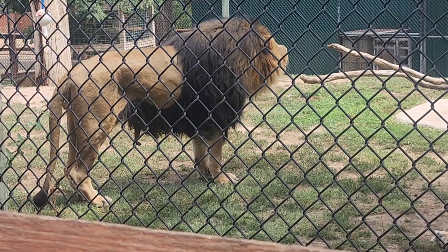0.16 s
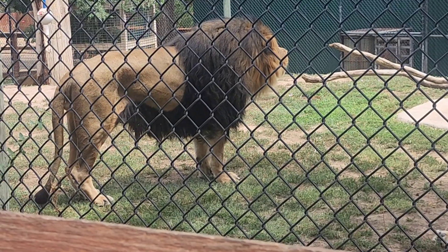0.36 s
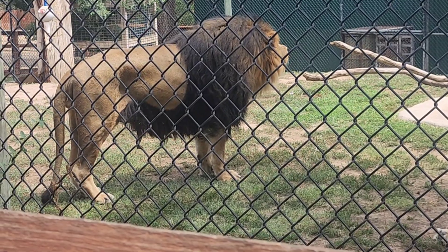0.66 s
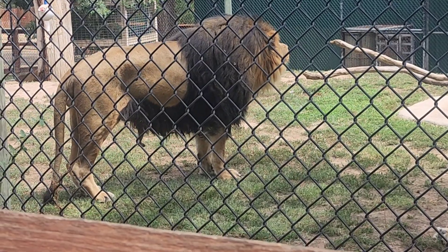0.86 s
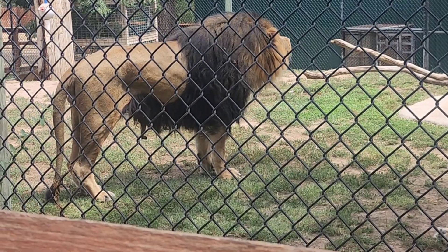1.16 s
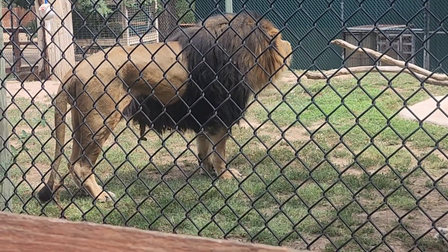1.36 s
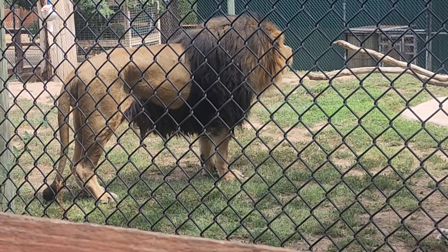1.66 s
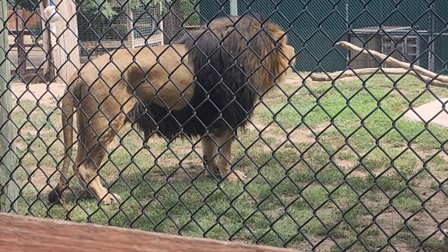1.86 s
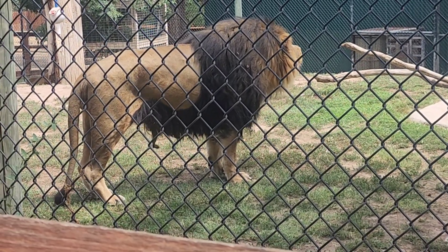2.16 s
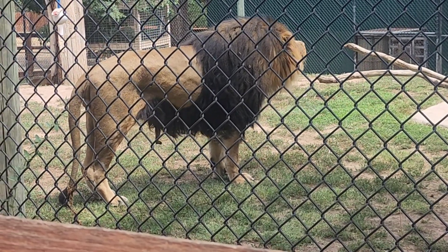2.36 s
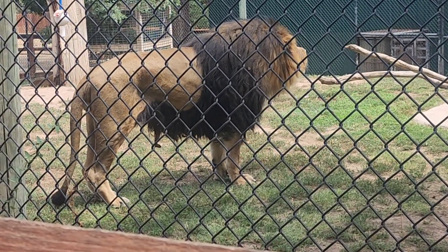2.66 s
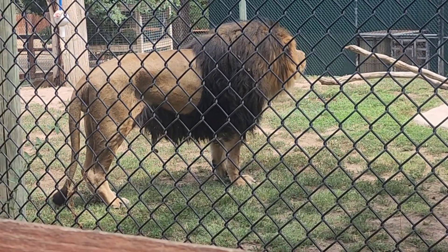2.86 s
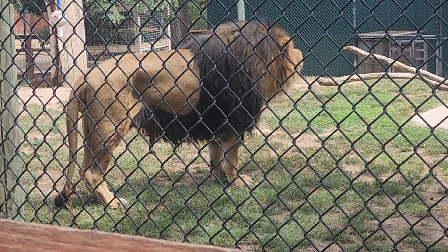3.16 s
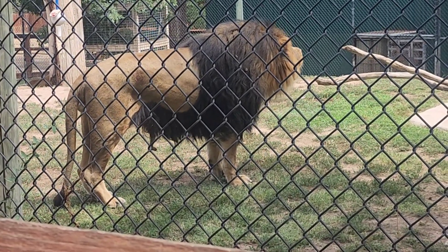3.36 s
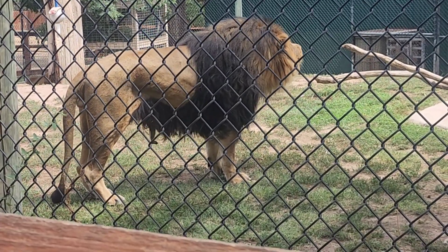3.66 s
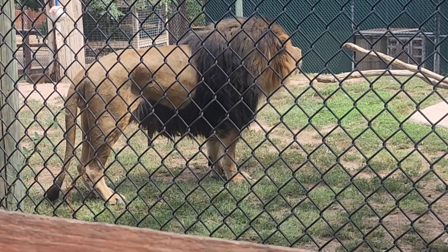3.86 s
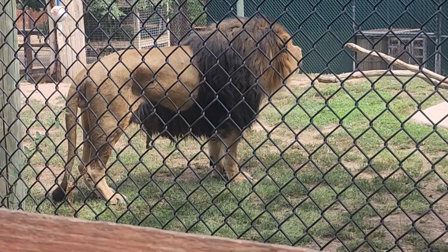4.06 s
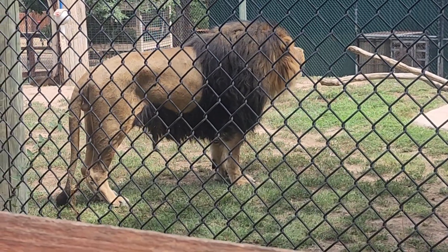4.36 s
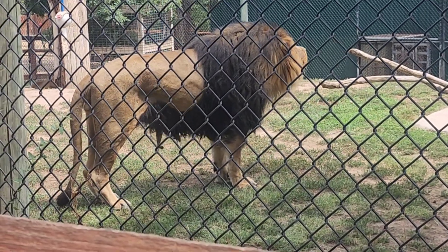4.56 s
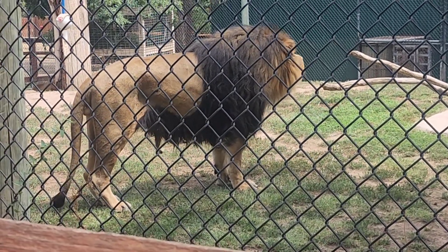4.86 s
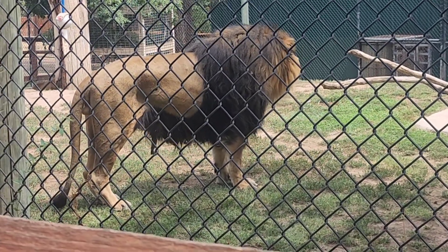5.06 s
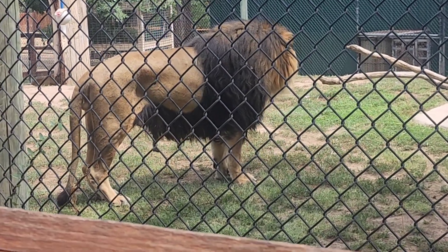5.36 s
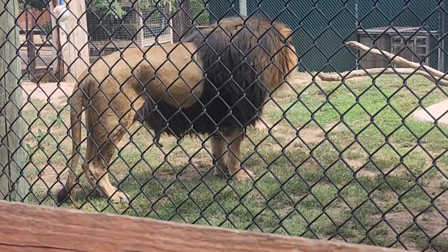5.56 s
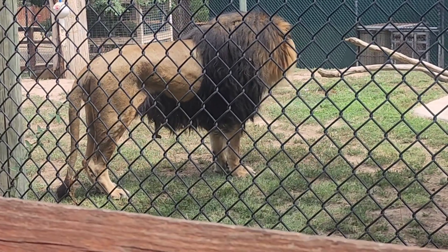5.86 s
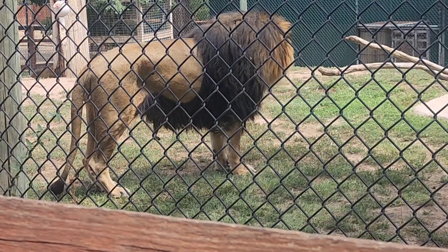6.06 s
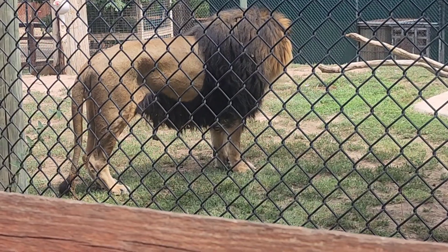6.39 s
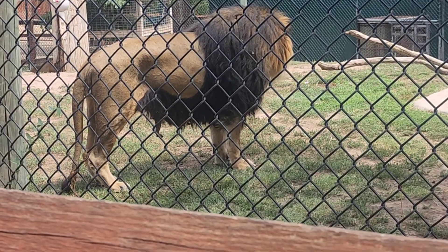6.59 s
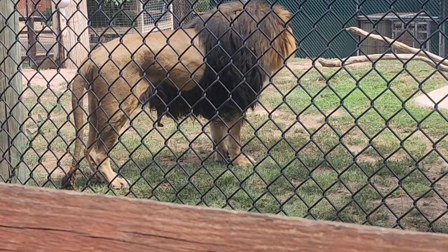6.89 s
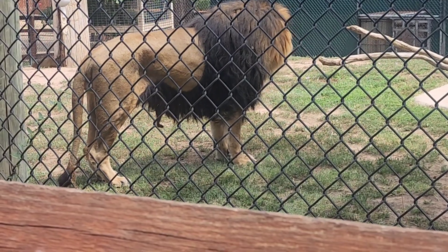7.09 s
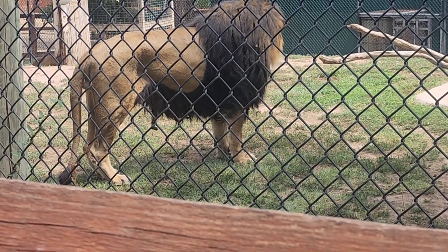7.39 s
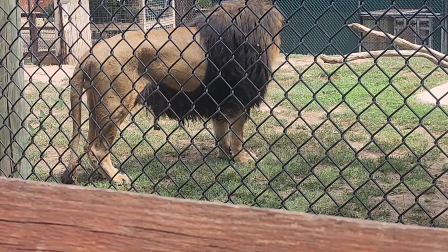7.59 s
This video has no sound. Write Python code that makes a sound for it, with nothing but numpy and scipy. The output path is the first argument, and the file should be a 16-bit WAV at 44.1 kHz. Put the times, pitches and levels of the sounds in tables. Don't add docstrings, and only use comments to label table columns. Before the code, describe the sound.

Close, heavy lion grunts repeat about once a second, hollow boom breaking into rough breathy growl, with faint hum, cloth rustle and one bird peep.

```python
import sys
import numpy as np
from scipy import signal
from scipy.fft import rfft, irfft, next_fast_len
from scipy.io import wavfile
from scipy.ndimage import uniform_filter1d

SR = 44100
rng = np.random.default_rng(int(sys.argv[2]) if len(sys.argv) > 2 else 0)


def wav_out(sig):
    wavfile.write(sys.argv[1], SR, np.round(np.clip(np.atleast_2d(sig).T, -1, 1) * 32767).astype(np.int16))


def decibels_to_gain(level_db):
    exponent = np.asarray(level_db, float) / 20
    return 10 ** exponent


N = 340893
T = np.arange(N) / SR


def unit(x):
    return x / np.sqrt(np.mean(x ** 2))


def band(x, hz, width_hz):
    return signal.lfilter(*signal.iirpeak(hz, hz / width_hz, SR), x)


def walk(rate_hz):
    k = int(SR / rate_hz)
    held = np.repeat(rng.standard_normal(N // k + 1), k)
    return 1.3 * uniform_filter1d(uniform_filter1d(held, k), k)[:N]


def body(x, modes, wobble_db):
    out = 0
    for k, (hz, width_hz, db) in enumerate(modes):
        width_hz = max(width_hz, hz / 14)
        gain = (-1) ** k * decibels_to_gain(db + wobble_db * walk(14))
        out = out + gain * band(band(x, hz, width_hz), hz, width_hz)
    return out


def steady(x, seconds):
    k = int(seconds * SR)
    power = uniform_filter1d(uniform_filter1d(x ** 2, k), k)
    return x / np.sqrt(power + 1e-9)


def puffs(events):
    out = np.zeros(N)
    for s, db, length_s in events:
        u = T[:int(.3 * SR)] / max(length_s, .003)
        at = slice(int(s * SR), min(int(s * SR) + len(u), N))
        burst = decibels_to_gain(db) * np.sin(np.pi / 2 * np.minimum(u / .3, 1)) * np.exp(-1.8 * u ** 2)
        out[at] += burst[:at.stop - at.start]
    return out


def bumps(events, width_s):
    coarse = T[::44]
    swells = sum(height * np.exp(-((coarse - s) / width_s) ** 2) for s, height in events)
    return np.interp(T, coarse, swells)


def thin_hiss(noise, hz, width_hz):
    return unit(band(band(noise, hz, width_hz), hz, width_hz))


# start t/s, boom breaks t/s, folds slip t/s, end t/s, top growl rate f/Hz
GRUNTS = [
    (-0.25, -0.04, 0.02, 0.305, 74),
    (1.0, 1.198, 1.235, 1.505, 74.7),
    (2.24, 2.452, 2.515, 2.745, 74.3),
    (3.415, 3.612, 3.632, 3.86, 76.4),
    (4.515, 4.707, 4.724, 4.92, 76.6),
    (5.65, 5.812, 5.862, 6.07, 72),
    (6.79, 6.95, 6.998, 7.18, 71.5),
]


def course(knots):
    stages = np.vstack([knots(*grunt) for grunt in GRUNTS])
    return uniform_filter1d(np.interp(T, *stages.T), size=300)


# boom/dB, growl/dB, throat/dB, hiss/dB
STRENGTH = [(1.2, 2, 0, 0.5), (1.7, 2.1, 0.5, 0), (0.5, 1.2, -1, 0.5), (0.5, 0.5, -1, -0.2),
            (1.5, -3.5, -0.8, -0.2), (-0.5, 0, -1, -1.5), (1.55, 1, -1.5, 1)]
JAWS_DB = [0.5, 2, 0.5, 2.5, 4.5, 1.7, 0.5]


def strength(column):
    grunt = np.searchsorted(np.array(GRUNTS)[1:, 0], T)
    return np.c_[STRENGTH, JAWS_DB][grunt, column]


# t/s, depth/dB
CHOKES = [(0.016, -6), (0.04, -7.5), (0.126, -15.5), (0.2, -8), (1.272, -6.5), (1.358, -9.5), (2.452, -6),
          (2.53, -12.5), (2.606, -15.5), (3.519, -2.5), (3.595, -7), (3.688, -13), (4.612, -3.5),
          (4.712, -5), (4.803, -10.5), (5.848, -8.5), (5.925, -8.5), (5.998, -6), (6.965, -9.5),
          (7.066, -6)]


def choke_db():
    return bumps(CHOKES, width_s=.016)


# f/Hz, width/Hz, level/dB
CHEST = (116.4, 91.6, 10.16)


def chest_db(hz):
    return CHEST[2] / (1 + (2 * (hz - CHEST[0]) / CHEST[1]) ** 2)


CLIMB_S, BREAK_S, SLIP_S, LET_GO_S, HUSH_S = .066, .03602, .03012, .029, .025
ONSET_HZ, CREEP_HZ, BREAK_HZ, SLIP_HZ, SLACK_HZ, SAG_BEND = 59.5, 3.1, 67.53, 58.99, 31.95, 1.1
ONSET_DB, HUSH_DB, BOOM_DB, DROOP_DB, BROKEN_DB = -32.5, -28, -8, -3, -36
GROWL_HELD_DB, GROWL_DB, THIRD_HELD_DB, THIRD_DB = -44, -30.5, -42.5, -36
SLACK_DB_PER_OCT, FADE_FROM, FADE_DB = 12.5, 0.72, -18
# t/s, level/dB
WAVERS = [(1.12, -1.5), (1.15, 1.2), (2.392, -5), (3.515, -2.5), (3.535, 3), (3.57, 1.5), (3.59, 3),
          (4.61, -4), (4.628, 1.5), (4.688, 1.5), (5.762, 2), (6.882, -4), (6.9, 3), (6.93, -6.5)]
# t/s, boom level/dB
CATCHES = [(0.035, -22), (0.068, -16), (0.145, -21.5), (1.222, -14.5), (1.285, -19), (1.32, -19),
           (2.488, -12), (2.565, -22), (3.635, -23), (3.686, -11), (4.73, -26.5), (5.825, -18.5),
           (5.875, -26), (6.977, -13)]
# growl rate f/Hz, roughness 0-1
ROUGH = [(35, .8), (58, .6), (66, .12), (72, .06)]
# multiple of growl rate, level over the third/dB
OVERTONES = [(4, -12), (5, -5)]


def folds():
    gate = course(lambda start, cut, slip, end, top: [(start, 0), (start, 1), (end, 1), (end, 0)])
    sag = course(lambda start, cut, slip, end, top: [(start, 0), (slip, 0), (end, 1)])
    taut_hz = course(lambda start, cut, slip, end, top: [
        (start, ONSET_HZ), (start + CLIMB_S, top - CREEP_HZ), (cut - BREAK_S, top), (cut, BREAK_HZ),
        (max(cut, slip - SLIP_S), BREAK_HZ), (slip, SLIP_HZ), (end, SLIP_HZ)])
    sunk = np.sin(np.pi / 2 * np.clip(sag, 0, 1) ** SAG_BEND) ** 2
    hz = taut_hz - (SLIP_HZ - SLACK_HZ) * sunk
    fade_db = FADE_DB * np.clip((sag - FADE_FROM) / (1 - FADE_FROM), 0, 1)
    slack_db = SLACK_DB_PER_OCT * np.log2(np.minimum(hz / SLIP_HZ, 1)) + fade_db

    held_db = course(lambda start, cut, slip, end, top: [
        (start, ONSET_DB), (start + HUSH_S, HUSH_DB), (start + CLIMB_S, BOOM_DB),
        (cut, BOOM_DB + DROOP_DB), (end, BOOM_DB + DROOP_DB)])
    held_db = held_db + strength(column=0) + bumps(WAVERS, width_s=.0082)
    holding = course(lambda start, cut, slip, end, top: [(start, 1), (cut - LET_GO_S, 1), (cut, 0), (end, 0)])
    boom = holding * decibels_to_gain(held_db) + (1 - holding) * decibels_to_gain(BROKEN_DB + chest_db(2 * hz) + slack_db)
    boom += bumps([(s, decibels_to_gain(db)) for s, db in CATCHES], width_s=.016)

    broken = course(lambda start, cut, slip, end, top: [(start, 0), (start + CLIMB_S, 0), (cut, 1), (end, 1)])
    growl_db = GROWL_HELD_DB + broken * (GROWL_DB - GROWL_HELD_DB) + slack_db
    bare_db = THIRD_HELD_DB + broken * (THIRD_DB - THIRD_HELD_DB + strength(column=1)) + fade_db
    third_db = bare_db + chest_db(3 * hz)

    rough = np.interp(hz, *np.transpose(ROUGH))
    turns = np.cumsum(hz * (1 + .08 * rough * walk(45))) / SR
    lines = boom * decibels_to_gain(7.3 * rough * walk(40)) * np.sin(4 * np.pi * turns)
    lines += decibels_to_gain(growl_db) * np.sin(2 * np.pi * turns)
    lines += decibels_to_gain(third_db + 2.0 * rough * walk(40)) * np.sin(6 * np.pi * turns + 0.98)
    for k, db in OVERTONES:
        gain = decibels_to_gain(bare_db + chest_db(k * hz) + db + 4.0 * rough * walk(40))
        lines += gain * np.sin(2 * np.pi * k * turns + 0.46 * k * rough * walk(50))
    return gate * np.sqrt(2) * lines, turns


SHUT_DB, RELEASE_S, TRAIL_S = -24.5, .11, 0.022


def exhale(open_db, rise_s, late_db, leak_s, leak_db):
    return course(lambda start, cut, slip, end, top: [
        (start, open_db + SHUT_DB), (start + leak_s, open_db + leak_db), (start + rise_s, open_db), (cut, open_db),
        (end - RELEASE_S, late_db), (end + TRAIL_S, late_db + SHUT_DB)])


# f/Hz, width/Hz, level/dB
THROAT = [(242, 110, 1.5), (355.7, 62, 4), (439, 81, -4), (527, 60, -5), (631.6, 130, -6.5), (711, 78, 1.5),
          (832, 140, -6), (979, 120, -9), (1140, 160, -12)]
MOUTH = [(1547, 460, -4.5), (1914, 216, 1.5), (2288, 290, 2), (2685, 266, -0.7), (3004, 280, -8.5),
         (3553, 530, -15), (4490, 900, -20.5), (6420, 1200, -29.5), (7520, 630, -28), (11500, 13000, -41)]
FLAP_MODES = [(886, 210, 0), (1080, 190, -10.5), (242, 73, 2)]
# t/s, level/dB, length/s
FLAPS = [(0.052, -19.5, 0.054), (0.13, -18, 0.036), (0.222, -29.5, 0.02), (1.156, -23, 0.039),
         (1.31, -18, 0.025), (2.551, -16.5, 0.036), (3.635, -34.5, 0.027), (3.694, -21, 0.034),
         (4.663, -31.5, 0.027), (4.724, -24.5, 0.041), (5.805, -28.5, 0.035), (5.872, -26, 0.035),
         (5.947, -37, 0.044), (6.895, -28.5, 0.033), (6.986, -21, 0.037), (7.078, -30, 0.035)]
# f/Hz, width/Hz, gain
GAPE = (1040, 280, 3.0)
LIPS = (3300, 520, 1.6)
# f/Hz, width/Hz
NOSE_DIP = (1370, 160)
HISS_CHOKE, HISS_LAG_S, FLAP_HZ = 0.61, .004, 608


def breath(turns):
    gate = course(lambda start, cut, slip, end, top: [
        (start, 0), (start, 1), (end + TRAIL_S, 1), (end + TRAIL_S, 0)])
    choke = choke_db()
    throat_db = exhale(open_db=-29, rise_s=.062, late_db=-36, leak_s=.026, leak_db=-17.5)
    throat_db = throat_db + strength(column=2) + choke
    hiss_db = exhale(open_db=-40.5, rise_s=.15, late_db=-42, leak_s=.065, leak_db=-9)
    hiss_db = hiss_db + strength(column=3) + HISS_CHOKE * np.roll(choke, int(HISS_LAG_S * SR))

    beat = (2 * turns).astype(int)
    size = decibels_to_gain(3.0 * rng.standard_normal(N // 100)[beat] - 5.0 * (beat % 2))
    snaps = unit(np.diff(beat, prepend=0) * size)
    pulse = np.cos(4 * np.pi * turns)
    puff = uniform_filter1d(size, size=300) ** .7 * (1 - .35 * pulse)
    air = unit(puff * rng.standard_normal((5, N)))

    throat = body(.8 * snaps + 1.2 * air[0] + .5 * air[1:3], THROAT, wobble_db=3.5)
    bend = uniform_filter1d(np.gradient(np.gradient(turns)), size=1500)
    climb = np.clip(bend * SR ** 2 / 150, 0, 1)
    throat = steady(throat + GAPE[2] * climb * band(throat, *GAPE[:2]), .04)

    hiss = steady(body(air[0] + 1.2 * air[3:], MOUTH, wobble_db=3.5), .04)
    dying = course(lambda start, cut, slip, end, top: [(start, 0), (slip, 0), (end, 1)])
    hiss = hiss + LIPS[2] * dying * band(hiss, *LIPS[:2])

    ring = np.sin(2 * np.pi * FLAP_HZ * T + .5 * walk(60)) * (1 - .5 * pulse)
    slap = unit(body(rng.standard_normal(N), FLAP_MODES, wobble_db=2.5))
    flaps = puffs(FLAPS) * (0.55 * ring + 0.16 * slap)
    high = gate * (decibels_to_gain(throat_db) * throat + decibels_to_gain(hiss_db + 1.5) * hiss) + flaps
    return high - .95 * band(high, *NOSE_DIP)


def lion():
    lines, turns = folds()
    return lines, breath(turns)


TOP_DB, TOP_EARLY_DB, TOP_OPENS_S, TOP_PEAKS_S, TOP_CHOKE = -70.5, -10.5, .06, .06, 1.2


def spit():
    grains = rng.standard_normal((2, N)) * decibels_to_gain(2.5 * rng.exponential(size=N))
    jaws_db = course(lambda start, cut, slip, end, top: [
        (start + TOP_OPENS_S / 2, TOP_DB + SHUT_DB), (start + TOP_OPENS_S, TOP_DB + TOP_EARLY_DB),
        (cut + TOP_PEAKS_S, TOP_DB), (end + RELEASE_S, TOP_DB + SHUT_DB)])
    level_db = jaws_db + strength(column=4) + TOP_CHOKE * choke_db()
    return decibels_to_gain(level_db) * thin_hiss(grains, hz=10000., width_hz=8000.)


# f/Hz, level/dB, t60/s
DEN_MODES = [(141, -10, 1), (113, -30.5, 0.89)]


def den(voice):
    return sum(decibels_to_gain(db) * band(voice, hz, np.log(1000) / np.pi / t60_s) for hz, db, t60_s in DEN_MODES)


def pen(voice, t60_s=.79, split_hz=840.0):
    t = T[:int(t60_s * SR)]
    mid, side = rng.standard_normal((2, len(t))) * decibels_to_gain(-60 * t / t60_s)
    side = signal.sosfilt(signal.butter(2, split_hz, "high", fs=SR, output="sos"), side)
    tail = np.array([mid + side, mid - side]) / np.sqrt(np.sum(mid ** 2))
    return decibels_to_gain(-13) * signal.fftconvolve(voice, tail, axes=1)[:, :N]


# f/Hz, density/dB per Hz
PARK = [(20, -22), (54, -9), (70, -5), (91, -18), (115, -2), (145, -8.5), (175, -17.5), (300, -25),
        (800, -27), (1200, -34), (3500, -39), (5000, -54.5), (7800, -59), (8700, -71.5), (9800, -71),
        (15500, -71)]


def park():
    size = next_fast_len(N)
    hz = np.fft.rfftfreq(size, 1 / SR) + 1e-3
    knot_hz, knot_db = np.transpose(PARK)
    colour = decibels_to_gain(np.interp(np.log(hz), np.log(knot_hz), knot_db))
    noise = rfft(rng.standard_normal((2, size))) * colour
    swell, out = walk(1.0), 0
    for centre_hz in 25 * 2 ** np.arange(0, 9.6, .5):
        window = np.cos(np.pi * np.clip(np.log2(hz / centre_hz), -.5, .5)) ** 2
        mid, side = irfft(noise * window, size)[:, :N]
        flicker = decibels_to_gain(.8 * swell + 1.2 * walk(9))
        spread = min(centre_hz / 1100.0, 1.1)
        out = out + flicker * (mid + spread * side * np.array([[1], [-1]]))
    return unit(out) * decibels_to_gain(-46)


# t/s, level/dB
HUM = [(0.6, -48), (0.71, -61), (0.9, -59), (1.8, -68), (1.91, -47), (2.15, -52.5), (3.05, -48),
       (3.27, -42.5), (4.1, -44.5), (4.45, -51), (5.2, -56), (5.55, -73), (6.3, -47.5), (6.42, -58),
       (6.61, -45), (6.7, -57), (7.52, -64), (7.73, -50)]


def hum():
    gain = decibels_to_gain(np.interp(T, *np.transpose(HUM)) + 2.0 * walk(15))
    return np.sqrt(2) * gain * np.sin(2 * np.pi * 120.5 * T + 1.1 * walk(5.8))


# t/s, level/dB
GUSTS = [
    (0.08, -78),
    (4.24, -88.5),
    (5.21, -80.5),
    (5.5, -80.5),
    (5.63, -83.5),
    (6.2, -85.5),
    (6.37, -81.5),
    (6.62, -86),
    (7.73, -77.5),
]


def leaves():
    level = decibels_to_gain(-97) + bumps([(s, decibels_to_gain(db)) for s, db in GUSTS], width_s=.07)
    tick = bumps([(.002, decibels_to_gain(-56))], width_s=.008)
    return (level + tick) * thin_hiss(rng.standard_normal((2, N)), hz=13000., width_hz=5000.)


# t/s, level/dB, length/s
RUSTLES = [(0.3546, -55.5, 0.036), (0.6394, -68, 0.04), (0.7394, -58.5, 0.041), (0.8699, -53.5, 0.044),
           (1.7894, -56, 0.045), (1.9629, -60, 0.04), (2.0394, -60, 0.032), (2.1494, -64, 0.04),
           (3.0594, -54.5, 0.065), (3.2094, -57.5, 0.033), (3.3794, -59, 0.04), (4.2118, -63.5, 0.035),
           (5.1094, -65, 0.04), (5.1994, -54.5, 0.045), (5.3094, -67, 0.04), (5.5, -62.5, 0.047),
           (5.5494, -50.5, 0.043), (5.6294, -53.5, 0.047), (6.0394, -62.5, 0.037), (6.3294, -50, 0.047),
           (6.5909, -50, 0.04), (6.6294, -60.5, 0.027), (7.2894, -55.5, 0.034), (7.5794, -58.5, 0.031)]


def rustle():
    grains = rng.standard_normal((2, N)) * decibels_to_gain(1.5 * rng.exponential(size=(2, N)))
    return 0.23 * puffs(RUSTLES) * unit(band(grains, 4500., 6000.))


# t/s, f/Hz, level/dB
PEEP = [
    (1.615, 1960, -73),
    (1.635, 1850, -68),
    (1.66, 2030, -55.5),
    (1.69, 2370, -58),
    (1.7, 2350, -85),
]


def bird():
    s, hz, db = np.transpose(PEEP)
    gain = decibels_to_gain(np.interp(T, s, db, -140, -140))
    return np.sqrt(2) * gain * np.sin(2 * np.pi * np.cumsum(np.interp(T, s, hz)) / SR)


def scene():
    low, high = lion()
    voice = low + high
    near = high + np.array([np.roll(low, shift=7), low])
    animal = near + pen(voice) + den(voice[0]) + spit()
    return animal + park() + hum() + leaves() + rustle() + bird()


def top_cut(x):
    return signal.sosfilt(signal.butter(12, 15720, fs=SR, output="sos"), x)


def record(dry):
    left = (dry[0] - .65 * band(dry[0], 2600., 1600.)) * decibels_to_gain(.6)
    ports = np.array([left, dry[1] * decibels_to_gain(-.6)])
    ports = ports - .75 * band(ports, 8750., 900.)
    return top_cut(np.tanh(0.49 * ports) / 0.41)


dry = scene()
out = record(dry)
wav_out(out)
```